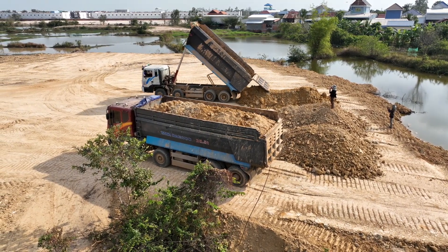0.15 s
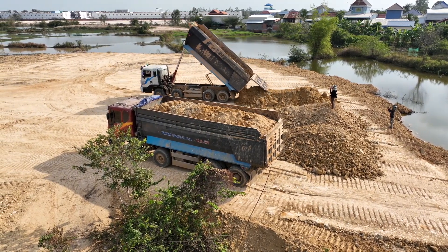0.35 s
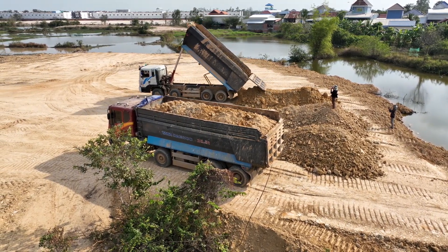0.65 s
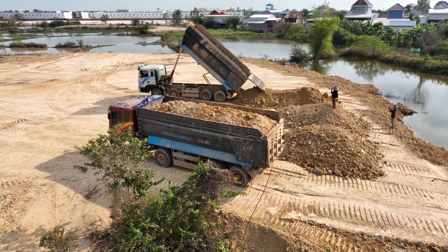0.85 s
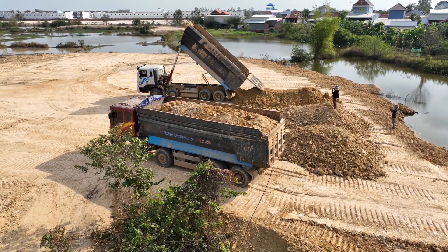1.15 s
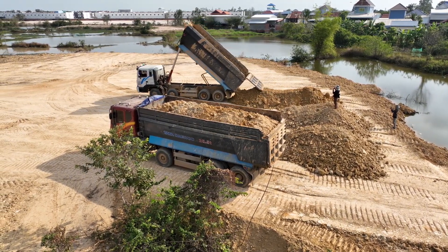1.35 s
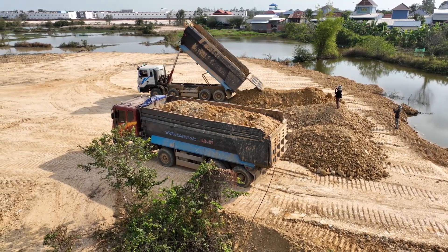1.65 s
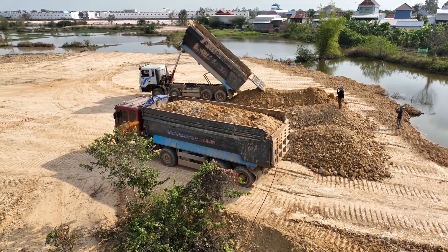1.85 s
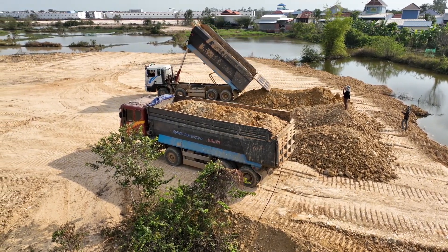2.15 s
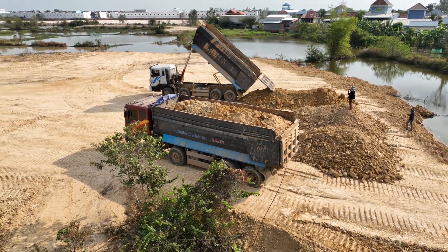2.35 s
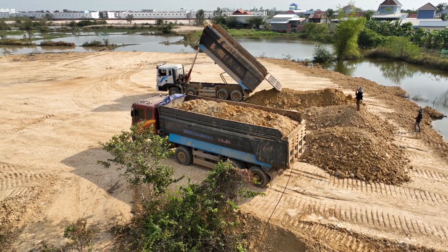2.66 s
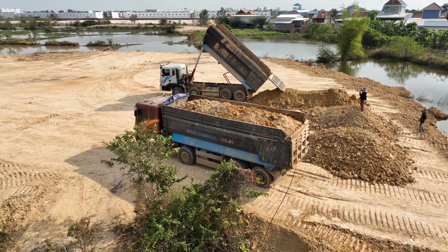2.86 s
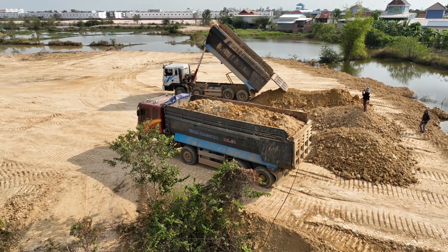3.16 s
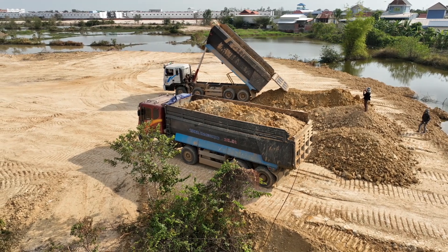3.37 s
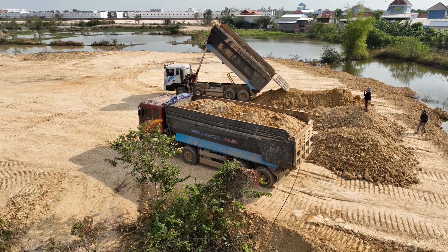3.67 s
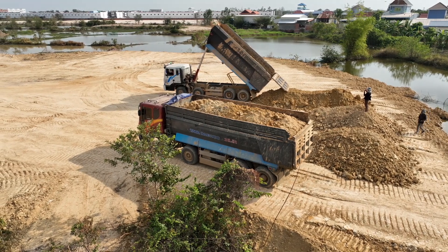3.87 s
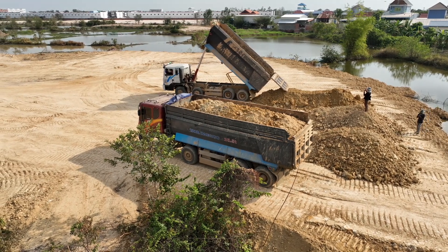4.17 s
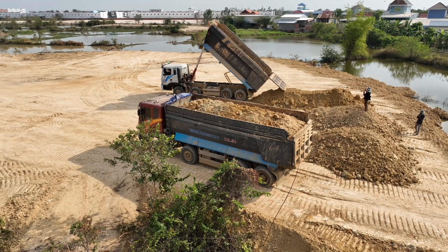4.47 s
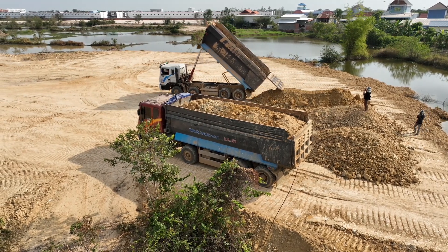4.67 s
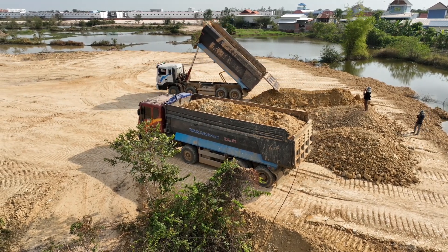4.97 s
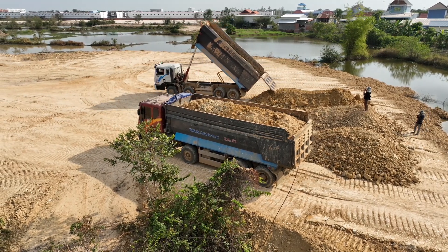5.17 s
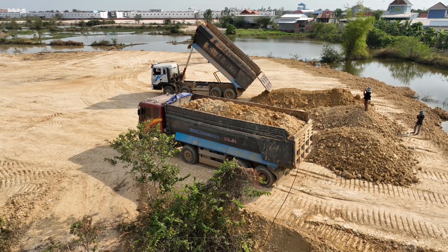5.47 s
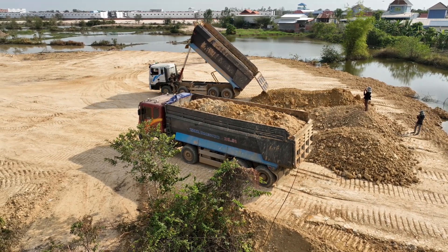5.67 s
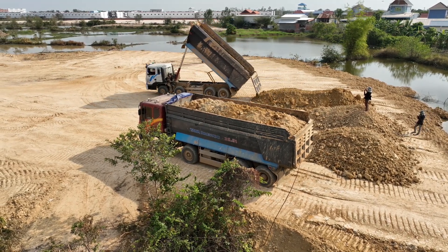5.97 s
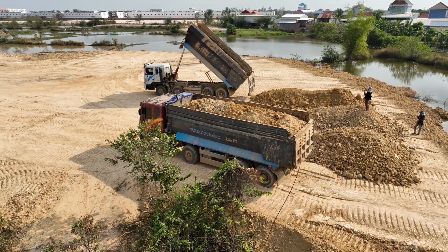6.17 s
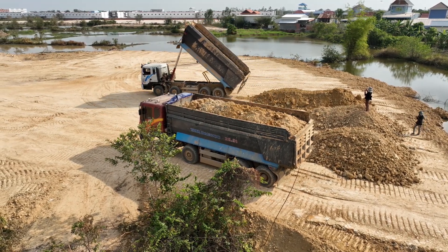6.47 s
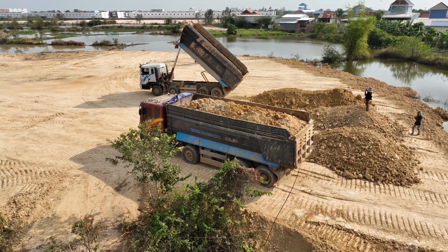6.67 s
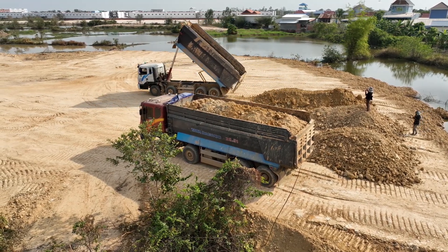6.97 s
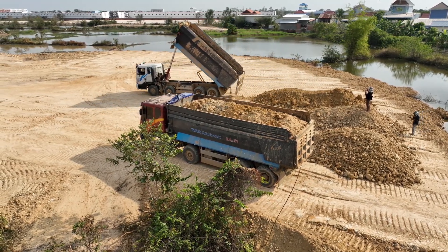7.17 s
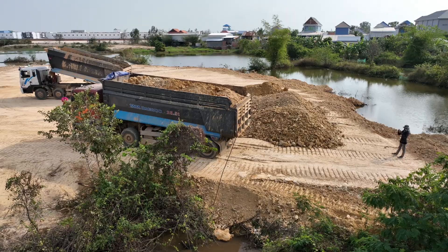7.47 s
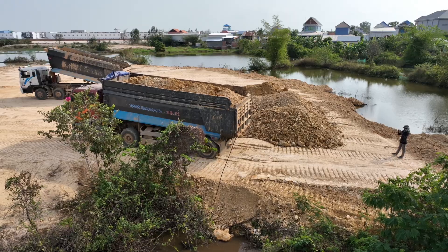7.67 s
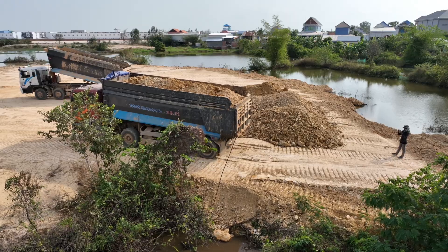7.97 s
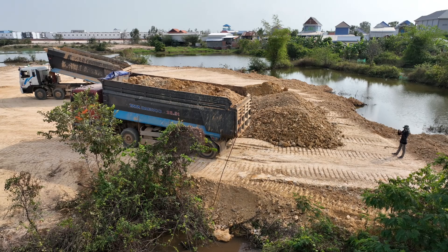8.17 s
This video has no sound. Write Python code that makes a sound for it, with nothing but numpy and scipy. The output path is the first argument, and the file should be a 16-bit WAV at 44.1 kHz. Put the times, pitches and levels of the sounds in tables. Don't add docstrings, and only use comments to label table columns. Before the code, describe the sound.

Open-air stereo microphone, distant view first: heavy engine drone with early hiss and one knock, sagging in pitch, then revving unevenly. Hollow low booms shake the tipping bed, hard metallic cracks cluster after five seconds, and a big gate crash rings near seven. The sound cuts abruptly to a closer, rougher idling diesel, clattering and knocking rapidly, with dry ticking and squeaking valves.

```python
import sys
import numpy as np
from scipy import signal
from scipy.fft import rfft, irfft
from scipy.io import wavfile
from scipy.ndimage import uniform_filter1d

SR = 44100
rng = np.random.default_rng(int(sys.argv[2]) if len(sys.argv) > 2 else 0)


def voltage_ratio(decibels):
    exponent = np.asarray(decibels, float) / 20
    return 10 ** exponent


def master_out(mix):
    frames = np.transpose(np.atleast_2d(mix))
    ceiling = np.clip(frames, -1, 1)
    pcm = np.round(ceiling * 32767).astype(np.int16)
    wavfile.write(sys.argv[1], SR, pcm)


N = 366912
T = np.arange(N) / SR

# start in seconds, end in seconds.
SILENCE = (7.2801, 7.2884)

# time in seconds, crankshaft speed in Hz.
CRANK_SPEED = [(0.0, 20.4), (.49, 21.25), (.66, 21.1), (.95, 20.6), (1.21, 20.0), (1.5, 19.3), (1.67, 18.4),
               (2.01, 17.1), (2.3, 16.1), (2.5, 15.5), (2.71, 14.6), (2.92, 14.5), (3.36, 15.1),
               (3.52, 15.2), (3.67, 14.7), (4.1, 12.6), (4.8, 15.2), (5.4, 13.9)]
# time in seconds, effort in dB.
EFFORT = [(0.0, 6.5), (0.3, 7.5), (0.65, 9.5), (0.95, 6), (1.1, 0.5), (1.22, 7), (1.5, -0.5), (1.7, 1.5),
          (2.03, 6), (2.3, -11), (2.5, -1), (2.75, -3), (3.0, 1), (3.43, 5.5), (3.68, 6.5), (3.83, -7),
          (4.1, 0.5), (4.8, 3.5), (5.4, -3)]
# order, level coasting in dB, level pulling in dB,
# gain coasting in dB per dB of effort, gain pulling in dB per dB of effort.
MAIN_ORDERS = [(3, -44.5, -39, 1.38, .3), (6, -35, -40, 0.35, 0.24), (8, -33.5, -36.5, 0.79, 0.33),
               (9, -45, -38.5, 1, 1.5)]
# order, level against order 6 in dB.
MINOR_ORDERS = [(2.5, -23), (4, -16), (5, -9.5), (5.5, -14), (6.5, -14), (7, -9), (12, -18.5), (15, -11)]
# time in seconds, pitch in Hz, level in dB.
PUMP = [(6.3, 136.1, -23.5), (6.8, 142.4, -31), (6.89, 155.2, -38), (7.006, 143.8, -28.5),
        (7.28, 148.1, -38)]
# time in seconds, firing rate in Hz, level in dB.
SECOND_ENGINE = [(4.2, 56.6, -43), (4.778, 54.6, -30), (4.9, 60.1, -32), (5.1, 55.5, -25), (5.5, 56.6, -32)]
# time in seconds, pitch in Hz, level in dB.
BED_SAG = [(5.63, 91, -31), (5.67, 74.7, -22), (5.72, 52.8, -24), (5.8, 45.4, -26), (5.95, 48.2, -30)]
PULL_S = 2.44

# time in seconds, level in dB.
SITE_ROAR = [(0.0, -32), (0.71, -32), (1.7, -35.5), (2.64, -39), (2.92, -40), (3.6, -35.5), (3.99, -40.5),
             (4.7, -39.5), (5.45, -37), (6.08, -38), (6.28, -32), (6.43, -36.5), (6.61, -39.5),
             (6.97, -36.5), (7.28, -39.5)]
# frequency in Hz, level in dB per Hz.
FAR_COLOUR = [(28, -75), (42, -51.5), (110, -46.5), (170, -49), (260, -53), (420, -66.5), (2750, -77.5),
              (3400, -80.5), (4300, -77), (6000, -77.5), (8400, -83.5), (10000, -78), (11200, -86.5),
              (12400, -109.6)]
# frequency in Hz, width in Hz, lift in dB.
FAR_BODY = [(420, 68, -4), (526, 323, 6), (713, 230, 5), (850, 48, -13), (1023, 170, 2.5), (1163, 216, 8),
            (1358, 49, -13), (1602, 390, 6), (2246, 166, 6.5), (3940, 430, 3.5)]
# frequency in Hz, left-right balance in dB,
# likeness from 0 to 1, phase in radians.
FAR_PORTS = [(60, 0.7, 0.99, -0.06), (170, -0.3, 0.99, -0.31), (350, 1.1, 0.87, -0.43),
             (650, -2.8, 0.8, -0.62), (1200, -2.0, 0.6, -0.25), (1750, -0.2, 0.57, -0.89),
             (2300, 1.3, 0.37, -0.49), (2900, 3.9, 0.25, -2.83), (4200, -2.4, 0.47, -0.96),
             (5000, 4.5, 0.45, -2.52), (5900, 10.3, 0.4, -1.49), (7500, 5.8, 0.45, 0.0),
             (8600, 0.4, 0.35, 0.07), (9300, -0.4, 0.75, -1.96)]
# frequency in Hz, left-
# right balance in dB, likeness from 0 to 1, phase in radians.
FAR_TOP = [(9600, 0, .85, -2.5), (9760, 0, 1, -np.pi), (10450, 0, 1, -np.pi), (11000, 0, .8, -3.9),
           (11700, 0, .97, -6.2)]
CYLINDERS = [1.5, -9, -1, -3, -3, -18]
BASS_DB, BASS_PER_ROAR = -7.5, 0.18
FAN_DB, FAN_NEAR_DB, FAN_FADE_S, FAN_PER_ROAR = -41.5, 8, 2.53, 0.12

# start in seconds, length in seconds, level in dB, centre in Hz, width in Hz.
NOISE_BURSTS = [(0.44, 0.064, -37, 4300, 6500), (4.67, 0.03, -58, 10200, 800), (0.4, .22, -36, 320, 30),
                (5.92, 0.36, -49, 3000, 3500), (6.44, .13, -33, 260, 220), (5.924, 0.09, -46, 2330, 700),
                (5.926, .09, -50, 4000, 900), (5.928, 0.035, -51, 8800, 1500), (6.085, 0.045, -49, 8800, 1300),
                (6.09, 0.1, -44.5, 2210, 300), (6.25, 0.39, -51.5, 3500, 2500), (6.47, .045, -45, 2150, 350),
                (6.84, 0.038, -41.5, 4140, 900), (7.44, 0.016, -47, 10500, 2200), (7.622, .02, -43, 10500, 2500)]

# time in seconds, peak in dB, brightness in dB per octave,
# decay t60 in seconds, low thud in dB.
KNOCKS = [(0.468, -23, 1.5, 0.16, -3), (4.878, -28, -4, 0.14, 0), (5.226, -12.5, 2.5, 0.04, 2),
          (5.383, -31, -3, 0.087, 0), (5.403, -22.5, -1, 0.12, 2), (5.422, -23.5, -2, .12, 3),
          (5.564, -17.5, 0.5, 0.09, 2), (5.585, -22.5, -4, 0.095, -4), (5.782, -33, 1, .08, 0),
          (5.838, -16.5, -2.5, 0.07, -9), (5.864, -23.5, -4, .08, -8), (6.089, -37, 10, 0.09, 0),
          (6.189, -28, -2, .1, 3), (6.226, -27, -2, .1, 2), (6.363, -29, -2, .1, 2),
          (7.167, -22.5, -4, .05, 1)]
# frequency in Hz, width in Hz, level in dB.
GATE_MODES = [(546, 140, -6.5), (660, 200, -9.5), (1122, 150, -1), (1647, 350, -11.5), (2220, 270, -14),
              (3990, 580, -21.5), (8900, 700, -36)]
# frequency in Hz, level in dB per Hz.
CRACK_COLOUR = [(200, -20), (500, 12.5), (1500, 11), (2600, 1.5), (3300, -0.5), (4400, -10), (5200, -30),
                (9000, -33), (11000, -56)]
THUD_BELOW_HZ = 800

# time in seconds, pitch in Hz, level in dB.
TURBO = [(.55, 4990, -62), (.76, 5040, -55), (.86, 5080, -61), (.93, 5100, -55), (1.08, 5120, -55),
         (1.17, 5150, -59), (1.3, 5175, -54), (1.5, 5180, -55), (1.63, 5150, -58), (1.9, 5070, -57),
         (2.02, 4980, -72), (2.42, 4740, -75), (2.53, 4680, -59), (2.75, 4560, -61)]
TURBO_WIDTH_HZ = 45

# start in seconds, hold in seconds, level in dB.
JOLTS = [(4.046, .01, -34), (4.14, 0.13, -23), (4.315, 0.036, -21.5), (4.44, 0.1, -29), (4.72, 0.12, -24.5),
         (4.846, 0.15, -20), (5.051, 0.21, -23), (5.426, 0.07, -15.5), (5.547, 0.13, -18.5),
         (5.79, .12, -19), (5.913, 0.25, -15.5), (6.12, 0.183, -13.5), (6.32, .11, -16.5),
         (6.48, 0.11, -24), (6.615, 0.032, -23), (6.774, 0.19, -20.5), (7.079, .2, -26.5)]
# frequency in Hz, width in Hz, level in dB.
BED_MODES = [(70.4, 6.5, 2.5), (79.2, 4.8, 1.5), (96.1, 1.8, -13), (105.8, 18, 2.5), (122.3, 11.2, 1),
             (170, 12, 0), (250.4, 29.5, -5)]
JOLT_RISE_DB_PER_S, JOLT_FALL_DB_PER_S, REST_DB = 330, 220, -53
BED_FROM_S, HUMP_DB = 4.0, 0.5
HUMP_HZ, HUMP_CLIMB_HZ_PER_S, HUMP_HZ_PER_DB = 98.7, 1.0, -0.5

# start in seconds, length in seconds, start pitch in Hz, end pitch in Hz, level in dB.
CHIRPS = [
    (4.87, .035, 3200, 3780, -57),
    (5.283, .03, 3320, 3700, -49),
]

SLAM_S, SLAM_DB = 6.796, -9.5
# frequency in Hz, level in dB per Hz.
SLAM_COLOUR = [(35, -32), (60, -4.5), (211, -5), (449, -7.5), (554, -5), (615, -4.5), (820, -10), (996, -1),
               (1340, -14.5), (2070, -18.5), (2840, -32), (4320, -31.5), (9000, -49), (11700, -78)]
# frequency in Hz, decay t60 in seconds.
SLAM_DECAY = [(100, 2.9), (260, 1.2), (700, 0.47), (1840, 0.38), (4850, 0.78)]
# frequency in Hz, level in dB, decay t60 in seconds.
SLAM_RING = [(187.6, -10.5, 0.65), (222, -16, 2.2), (330, -14.5, 0.4), (420, -12, 0.51), (540, -25, .25),
             (589, -20, 0.6), (945, -22, 0.26), (996, -15, 0.7), (1086, -4, 0.38), (1130, -25, 2),
             (2063, -23, 0.37), (4370, -40, .3)]
# start in seconds, length in seconds, level in dB, centre in Hz, width in Hz.
LATCH = (6.787, .034, -30, 2110, 200)
# time in seconds, level in dB, pitch in Hz.
REBOUNDS = [(5.241, -16, 210), (5.282, -19, 170), (6.807, -11, 260), (6.836, -10, 170), (6.862, -9, 170),
            (6.872, -9, 130), (6.899, -18, 160), (6.960, -7, 180), (7.0, -13, 170)]

# frequency in Hz, level in dB per Hz.
NEAR_COLOUR = [(25, -61), (60, -44.5), (150, -51.5), (260, -48), (430, -56), (750, -51.5), (1100, -57.5),
               (2000, -59), (3200, -69.5), (6000, -77.5), (8400, -83.5), (10000, -77.5), (11200, -87.5),
               (12400, -91)]
# frequency in Hz, width in Hz, lift in dB.
NEAR_BODY = [(606, 26, 10.5), (900, 24, 9.5), (1290, 81, 8), (1680, 260, 5), (2680, 130, 3.5),
             (5900, 200, -2)]
# frequency in Hz, left-right balance in dB,
# likeness from 0 to 1, phase in radians.
NEAR_PORTS = [(60, 0.8, 0.97, -0.03), (170, 0.5, 0.96, -0.18), (350, -0.3, 0.83, -0.55),
              (650, -8.9, 0.72, -1.45), (1200, -6.0, 0.51, -0.23), (1750, -2.9, 0.89, -1.01),
              (2300, 0.5, 0.72, -2.09), (2900, 3.0, 0.5, -2.7), (4200, -0.9, 0.46, 2.31),
              (5000, 2.7, 0.36, 1.39), (5900, 5.2, 0.42, -0.12), (7500, 6.1, 0.02, 0.91),
              (8600, 0.7, 0.48, 0.12), (9300, -0.1, 0.73, -1.95)]
# frequency in Hz, left-right balance in
# dB, likeness from 0 to 1, phase in radians.
NEAR_TOP = [(9600, 0, .85, -2.5), (9760, 0, 1, -np.pi), (10900, 0, 1, -np.pi), (11250, 0, .6, -4.5),
            (11700, 0, .97, -6.2)]
# order, level in dB.
IDLE_ORDERS = [(1, -7), (2, 1.5), (3, -7), (4, -8), (5, -5), (5.5, -1.5), (6, -4), (7, -9), (9, -1.5),
               (10, -5.5)]
VALVES = [6, -23, 8.5, -23, 5.5, -1]
# pitch in Hz, level in dB.
GEARS = [(603, -38), (897, -43), (1280, -40), (1507, -44), (1674, -38.5)]
# time in seconds, peak in dB.
FIRINGS = [(7.2904, -21), (7.3093, -15), (7.3467, -12), (7.3866, -14), (7.4176, -15), (7.4605, -19),
           (7.4904, -11), (7.5308, -21), (7.5737, -15), (7.6021, -13), (7.6366, -15), (7.6755, -11),
           (7.7099, -15), (7.7548, -19), (7.7947, -21), (7.8271, -16), (7.8596, -25), (7.8925, -19),
           (7.9284, -17), (7.9673, -16), (7.9997, -17), (8.0377, -19), (8.0806, -15), (8.1115, -22),
           (8.1484, -17), (8.1963, -22), (8.2192, -22), (8.2681, -30), (8.3026, -24)]
IDLE_HZ, IDLE_LINE_DB, IDLE_ROAR_DB, IDLE_HISS_DB = 27.25, -32, -21, -36
SETTLE_S, SETTLE_ROAR_DB, SETTLE_HISS_DB = .25, -1.5, 2
KNOCK_DB, KNOCK_T60_S, KNOCK_RISE_S, BLOCK_HZ, BLOCK_WIDTH_HZ = -6, .085, .004, 1690, 200
COVER_HZ, COVER_DB = 2700, -10

# time in seconds, peak in dB, centre in Hz.
TICKS = [(7.3667, -30, 5300), (7.4455, -33, 4880), (7.5961, -34, 5730), (7.7094, -33, 4890),
         (7.7694, -36, 5930), (7.8067, -30, 5930), (7.8194, -28, 5890), (7.8645, -31, 4860),
         (7.9294, -29, 5040), (7.9644, -40, 4890), (8.0252, -26, 5850), (8.1848, -31, 6350),
         (8.2434, -29, 5330), (8.2614, -33, 4900)]
TICK_S, TICK_WIDTH_HZ, TICK_DB = .009, 590, -9
# time in seconds, level in dB, pitch in Hz.
SQUEAKS = [(7.805, -46, 5900), (7.91, -38, 5260), (8.02, -36, 5900), (8.135, -44, 5200), (8.22, -42, 5100)]
# length in seconds, width in Hz.
SQUEAK_SHAPE = (.033, 900)


def evened(x):
    return x / np.sqrt(np.mean(x ** 2) + 1e-20)


def drift(per_s):
    steps = rng.standard_normal(400)
    return evened(np.interp(T * per_s, np.arange(400), steps))


def read(points, hz, column=1):
    rows = np.array(points, float)
    return np.interp(np.log(hz + 1), np.log(rows[:, 0] + 1), rows[:, column])


def curves(rows):
    s, *columns = np.transpose(rows)
    window = np.clip(np.minimum(T - s[0] + 0.03645, s[-1] + 0.12 - T) / 0.06, 0, 1)
    return [np.interp(T, s, c) for c in columns] + [window]


def add(mix, s, sound):
    part = mix[round(s * SR):][:len(sound)]
    part += sound[:len(part)]


def resonate(x, hz, width):
    r = np.exp(-np.pi * width / SR)
    if np.ndim(hz) == 0:
        return 2 * signal.lfilter([1 - r], [1, -r * np.exp(2j * np.pi * hz / SR)], x).real
    turn = np.exp(2j * np.pi * np.cumsum(hz) / SR)
    return 2 * (turn * signal.lfilter([1 - r], [1, -r], x * turn.conj())).real


def resonate_twice(x, hz, width, second_width):
    return resonate(resonate(x, hz, width), hz, second_width)


def coloured(x, spectrum, body=(), band=(400, 1500)):
    hz = np.fft.rfftfreq(len(x), 1 / SR)
    bumps_db = sum(lift / (1 + (2 * (hz - f) / w) ** 2) for f, w, lift in body)
    z = rfft(x) * voltage_ratio(read(spectrum, hz) + bumps_db)
    inside = (hz > band[0]) & (hz < band[1])
    return irfft(z, len(x)) * len(x) / np.sqrt(2 * np.sum(abs(z[inside]) ** 2))


def split(x, low_hz, high_hz):
    hz, z = np.fft.rfftfreq(len(x), 1 / SR), rfft(x)
    bass = irfft(z / (1 + (hz / low_hz) ** 4), len(x))
    treble = x - irfft(z / (1 + (hz / high_hz) ** 4), len(x))
    return bass, x - bass - treble, treble


def ports(x, other, table, edge_hz):
    hz = np.fft.rfftfreq(N, 1 / SR)
    alike = [(f, c * np.cos(p), c * np.sin(p)) for f, _, c, p in table]
    c = read(alike, hz) - 1j * read(alike, hz, column=2)
    left = rfft(x)
    right = c * left + np.sqrt(np.clip(1 - abs(c) ** 2, 0, 1)) * rfft(other)
    tilt = voltage_ratio(read(table, hz))
    scale = np.sqrt(2 / (1 + tilt ** 2)) / (1 + (hz / edge_hz) ** 90)
    return np.array([irfft(left * tilt * scale, N), irfft(right * scale, N)])


def scattered(x, t60=0.18):
    t = T[:3000]
    spray = rng.standard_normal(3000) * voltage_ratio(-60 * t / t60)
    return signal.oaconvolve(x, spray / np.linalg.norm(spray))[:N]


def orders(crank_hz, rows, window, wobble=.012, sway_db=0.5):
    on, out = window > 0, np.zeros(N)
    turns = np.cumsum((crank_hz * (1 + wobble * drift(15)))[on]) / SR
    for k, db in rows:
        level = voltage_ratio((db + sway_db * drift(9))[on])
        out[on] += level * np.sin(2 * np.pi * (k * turns + rng.random()))
    return np.sqrt(2) * window * out


def firing(crank_hz, per_turn, pattern_db, depth, fall=0.59, uneven_db=-1.0, rise=60, first_s=0):
    beats = np.cumsum(per_turn * crank_hz) / SR
    beats = beats - beats[round(first_s * SR)] + 600
    index = beats.astype(int)
    size = voltage_ratio(np.array(pattern_db)[index % 6] + uneven_db * rng.standard_normal(2000)[index])
    bursts = size * np.exp(-(beats % 1) / fall)
    return evened(uniform_filter1d(1 - depth + 2 * depth * bursts, rise))


def patchy(patch_db, flicker_db):
    _, t, z = signal.stft(rng.standard_normal((2, N)), nperseg=512)
    patches = uniform_filter1d(rng.standard_normal(z.shape[1:]), 8, 0)
    patches = evened(uniform_filter1d(patches, 12, 1))
    flicker = evened(uniform_filter1d(rng.standard_normal(len(t)), 10))
    return signal.istft(z * voltage_ratio(patch_db * patches + flicker_db * flicker), nperseg=512)[1][:, :N]


def hisses(rows):
    out = np.zeros(N)
    for s, length, db, hz, width in rows:
        air = resonate_twice(rng.standard_normal(round(length * SR)), hz, width, width)
        add(out, s, voltage_ratio(db) * evened(air) * signal.windows.tukey(len(air), .6))
    return out


def far_truck():
    hz, (effort_db, window) = curves(CRANK_SPEED)[0], curves(EFFORT)
    pull = np.clip((T - PULL_S) / 0.38 + .5, 0, 1)
    rows = []
    for k, coast_db, pull_db, coast, load in MAIN_ORDERS:
        coasting_db, pulling_db = coast_db + coast * effort_db, pull_db + load * effort_db
        rows.append((k, (1 - pull) * coasting_db + pull * pulling_db))
    sixth_db = rows[1][1]
    rows += [(k, sixth_db + db) for k, db in MINOR_ORDERS]
    lines = orders(hz, rows, window, wobble=.0015, sway_db=1.0)
    for table in (PUMP, SECOND_ENGINE, BED_SAG):
        hz, db, window = curves(table)
        lines = lines + orders(hz, [(1, db)], window, wobble=0.0065)
    return lines


def site_roar():
    roar_db, _ = curves(SITE_ROAR)
    swell_db = roar_db - roar_db.mean()
    leaving = np.exp(-(T / FAN_FADE_S) ** 2.3)
    hiss_db = FAN_DB + FAN_NEAR_DB * leaving + FAN_PER_ROAR * swell_db
    bass_db = BASS_DB + BASS_PER_ROAR * swell_db
    pulse = firing(curves(CRANK_SPEED)[0], 3, CYLINDERS, depth=0.16)
    pair = []
    for noise in patchy(0.6, 0.65):
        bass, middle, treble = split(coloured(noise * pulse, FAR_COLOUR, FAR_BODY), 433, 2140)
        pair.append(voltage_ratio(roar_db) * (voltage_ratio(bass_db) * bass + middle) + voltage_ratio(hiss_db) * treble)
    return ports(*pair, FAR_PORTS + FAR_TOP, 13300)


def noise_bursts():
    return hisses(NOISE_BURSTS)


def tailgate():
    out, t = np.zeros(N), T[:12000]
    for s, db, bright_db, t60, thud_db in KNOCKS:
        noise = rng.standard_normal(len(t))
        decay = voltage_ratio(-60 * t / t60) + 0.22 * voltage_ratio(-60 * t / 0.35)
        rattle = noise * np.minimum(t / 0.0021, 1) * decay
        ring = np.zeros(len(t))
        for f, w, g in GATE_MODES:
            tilt_db = bright_db * np.log2(f / 1000) + thud_db * (f < THUD_BELOW_HZ)
            ring += voltage_ratio(g + tilt_db) * resonate_twice(rattle, f, 0.54 * w, 3 * w) / np.sqrt(w)
        crack = coloured(noise, CRACK_COLOUR) * np.minimum(t / 0.0015, 1) * voltage_ratio(-60 * t / 0.095)
        add(out, s - .001, voltage_ratio(db) * (0.84 * ring / abs(ring).max() + voltage_ratio(bright_db - 11.0) * crack))
    return out


def turbo():
    hz, db, window = curves(TURBO)
    air = resonate_twice(rng.standard_normal(N), hz, TURBO_WIDTH_HZ, 2 * TURBO_WIDTH_HZ)
    core = orders(hz * (1 + .003 * drift(60)), [(1, db - 2.5)], window, wobble=.001, sway_db=2.5)
    return (core + window * voltage_ratio(db - 2.5) * evened(air)) * voltage_ratio([[1.5], [-3]])


def bed_boom():
    start = round(BED_FROM_S * SR)
    t = T[start:]
    jolts = []
    for s, hold, peak_db in JOLTS:
        rise_db = JOLT_RISE_DB_PER_S * np.maximum(s + 0.018 - t, 0)
        fall_db = JOLT_FALL_DB_PER_S * np.maximum(t - s - .04 - hold, 0)
        jolts.append(peak_db - rise_db - fall_db)
    db = np.max(jolts, axis=0).clip(REST_DB)
    hz = HUMP_HZ + HUMP_CLIMB_HZ_PER_S * (t - t.mean()) + HUMP_HZ_PER_DB * (db - db.mean())
    shake = (rng.standard_normal(N) * voltage_ratio(4.9 * drift(30)))[start:]
    panels = sum(voltage_ratio(g) * evened(resonate_twice(shake, f, w, 3 * w)) for f, w, g in BED_MODES)
    hump = resonate_twice(shake, hz, 38, 58)
    boom = evened(panels) + voltage_ratio(HUMP_DB) * hump / np.sqrt(uniform_filter1d(hump ** 2, 6000))
    boom = boom / np.sqrt(uniform_filter1d(boom ** 2, 3500))
    return np.pad(voltage_ratio(db - 2.0) * boom, (start, 0))


def bird():
    out = np.zeros(N)
    for s, length, from_hz, to_hz, db in CHIRPS:
        t = T[:round(length * SR)]
        add(out, s, voltage_ratio(db) * np.hanning(len(t)) * signal.chirp(t, from_hz, length, to_hz))
    return out


def slam():
    out, t = np.zeros(N), T[:22000]
    s, length, db, f, width = LATCH
    touch = rng.standard_normal(round(length * SR))
    song = evened(resonate_twice(touch, f, width, width)) + .6 * evened(resonate(touch, 700, 900))
    add(out, s, voltage_ratio(db) * signal.windows.tukey(len(touch), .3) * song)

    hz, frame, z = signal.stft(coloured(rng.standard_normal(len(t)), SLAM_COLOUR), SR, nperseg=512)
    z = z * voltage_ratio(-60 * frame / read(SLAM_DECAY, hz)[:, None])
    crash = signal.istft(z, SR, nperseg=512)[1][:len(t)]
    crash = crash * np.minimum(t / 0.011, 1) * (1 + 2.6 * voltage_ratio(-60 * t / .09))
    plate = np.zeros(len(t))
    for f, db, t60 in SLAM_RING:
        plate += voltage_ratio(db - 60 * t / t60) * np.sin(2 * np.pi * (f * t + rng.random()))
    add(out, SLAM_S, voltage_ratio(SLAM_DB - 5.5) * crash + voltage_ratio(SLAM_DB) * np.minimum(t / 0.0052, 1) * plate)

    for s, db, f in REBOUNDS:
        u = T[:round(1.5 * SR / f)]
        add(out, s - 0.76 / f, voltage_ratio(db) * np.hanning(len(u)) * np.cos(2 * np.pi * f * u - 1.5 * np.pi))
    return out


def block_knock():
    knock, t = np.zeros(N), T[:4000]
    for s, db in FIRINGS:
        strike = voltage_ratio(db + KNOCK_DB - 60 * t / KNOCK_T60_S) * np.minimum(t / KNOCK_RISE_S, 1)
        add(knock, s - KNOCK_RISE_S, strike)
    blow = rng.standard_normal(N)
    ring = resonate_twice(blow, BLOCK_HZ, BLOCK_WIDTH_HZ, 2 * BLOCK_WIDTH_HZ)
    ring = ring + voltage_ratio(COVER_DB) * resonate_twice(blow, COVER_HZ, 500, 700)
    return knock * ring / np.sqrt(uniform_filter1d(ring ** 2, 500))


def near_idle():
    window, settling = T > SILENCE[1], np.exp(-((T - SILENCE[1]) / SETTLE_S) ** 2)
    steady = np.zeros(N)
    hz = IDLE_HZ + steady
    roar_db = IDLE_ROAR_DB + SETTLE_ROAR_DB * settling
    hiss_db = IDLE_HISS_DB + SETTLE_HISS_DB * settling
    exhaust = orders(hz, [(k, IDLE_LINE_DB + db + steady) for k, db in IDLE_ORDERS], window, wobble=0.005)
    whine = orders(1 + steady, [(f, db + steady) for f, db in GEARS], window, wobble=.004, sway_db=4)
    clatter = firing(hz, 2, CYLINDERS, depth=0.3, rise=150, first_s=7.6)
    ticks = firing(hz, 1.8, VALVES, depth=0.13, rise=100, first_s=7.6)
    pair = []
    for noise in patchy(1.1, .3):
        bass, middle, treble = split(coloured(noise * clatter, NEAR_COLOUR, NEAR_BODY), 300, 1300)
        hiss = treble * ticks / clatter
        pair.append(voltage_ratio(roar_db) * (voltage_ratio(-4.5) * bass + middle) + voltage_ratio(hiss_db + 13.0) * hiss)
    return ports(pair[0] + exhaust + whine + block_knock(), pair[1], NEAR_PORTS + NEAR_TOP, 12200)


def valve_train():
    length, width = SQUEAK_SHAPE
    squeaks = [(s, length, db, hz, width) for s, db, hz in SQUEAKS]
    ticks = [(s - .002, TICK_S, db + TICK_DB, hz, TICK_WIDTH_HZ) for s, db, hz in TICKS]
    return hisses(squeaks + ticks)


def scene():
    hum = far_truck() + bed_boom()
    blows = tailgate() + slam()
    small = noise_bursts() + bird() + valve_train()
    ahead = [(f, db, .9, .1) for f, db, _, _ in FAR_PORTS]
    far = site_roar() + turbo()
    far = far + ports(hum, 0.5 * scattered(hum), FAR_PORTS, 11900)
    far = far + ports(blows, scattered(blows), ahead, 9800)
    details = ports(small, scattered(small, 0.048), FAR_PORTS, 12600)
    return far * (T < SILENCE[0]) + near_idle() * (T > SILENCE[1]) + details


def low_pass(x):
    return signal.sosfilt(signal.butter(12, 12850, fs=SR, output="sos"), x)


def record(dry):
    soft = 1.05 * np.tanh(dry / 1.05)
    return low_pass(soft)


dry = scene()
out = record(dry)
master_out(out)
```